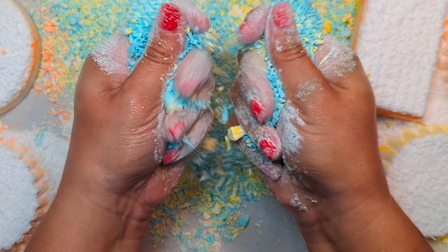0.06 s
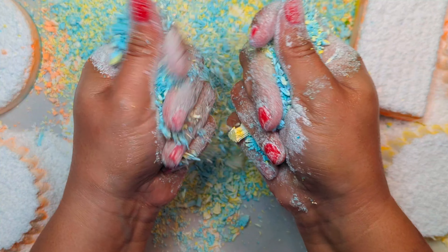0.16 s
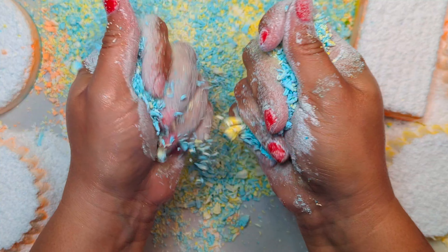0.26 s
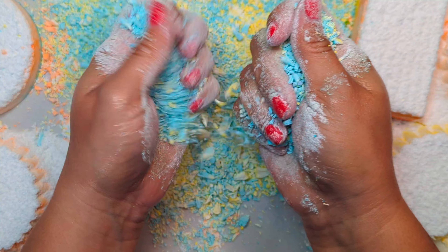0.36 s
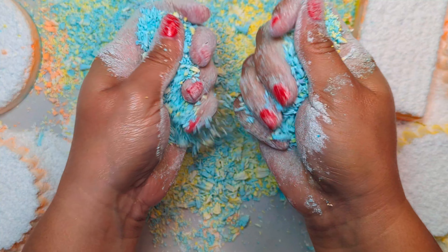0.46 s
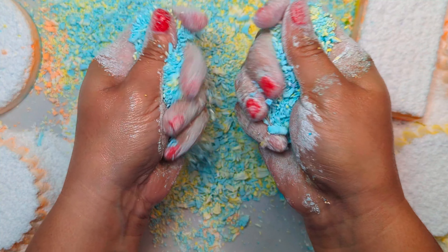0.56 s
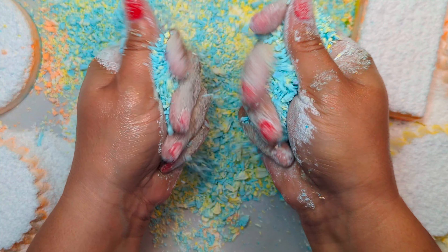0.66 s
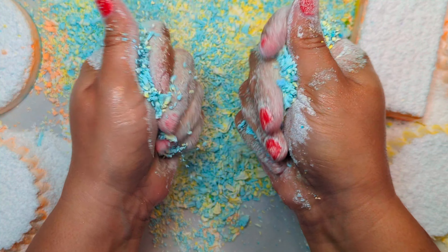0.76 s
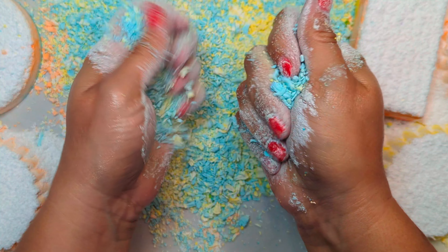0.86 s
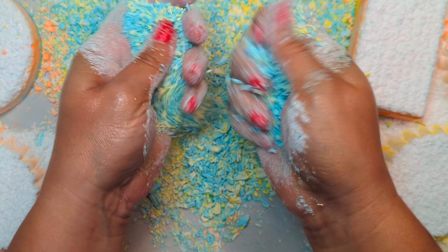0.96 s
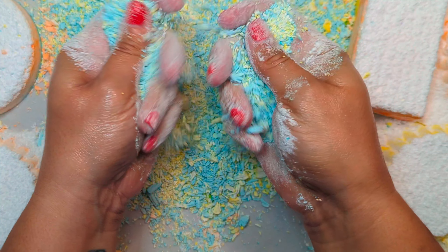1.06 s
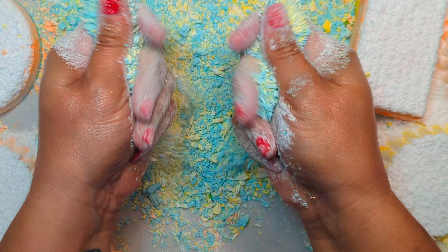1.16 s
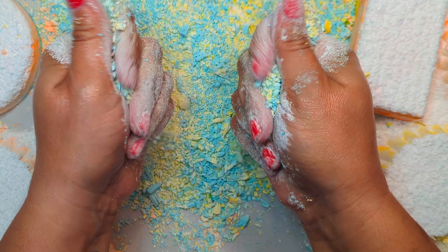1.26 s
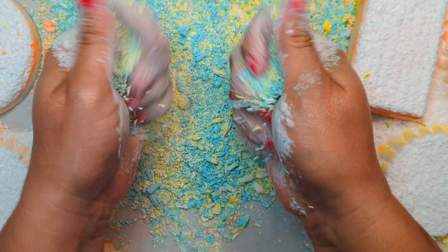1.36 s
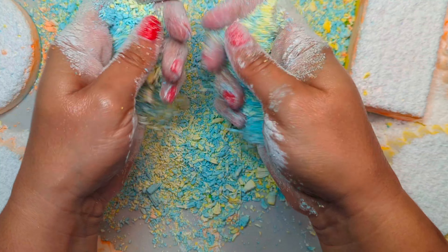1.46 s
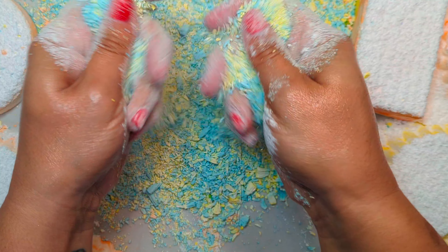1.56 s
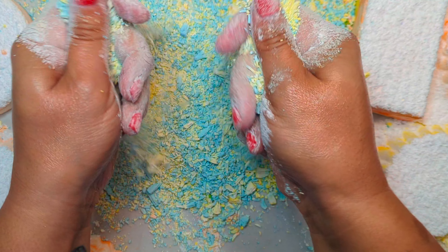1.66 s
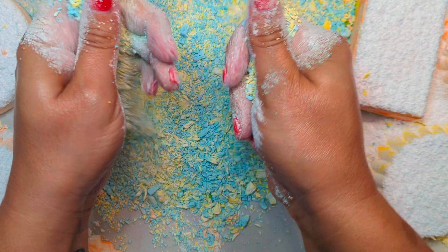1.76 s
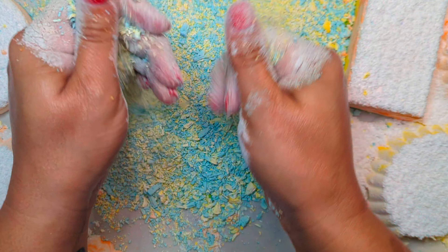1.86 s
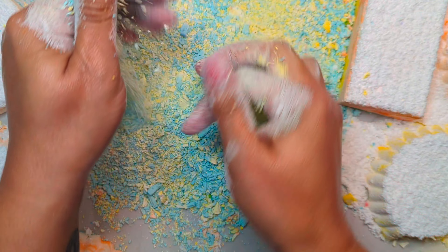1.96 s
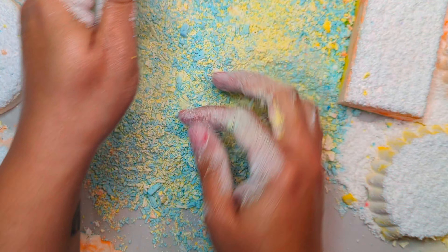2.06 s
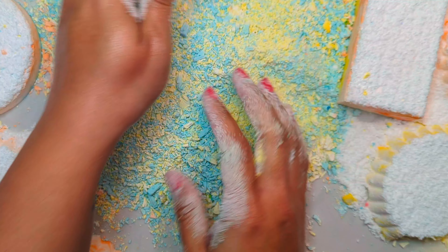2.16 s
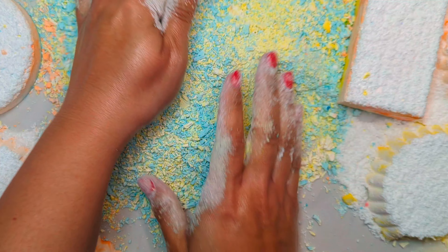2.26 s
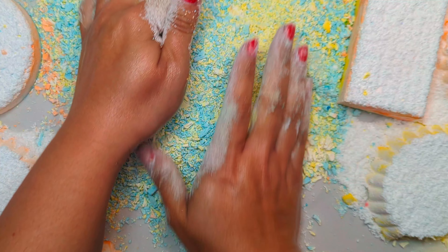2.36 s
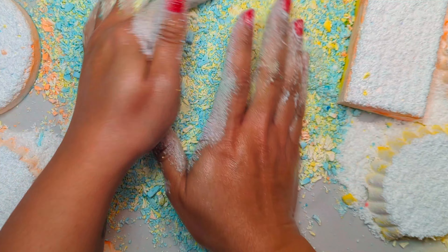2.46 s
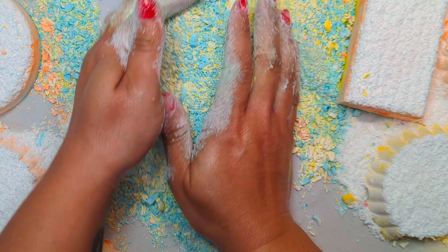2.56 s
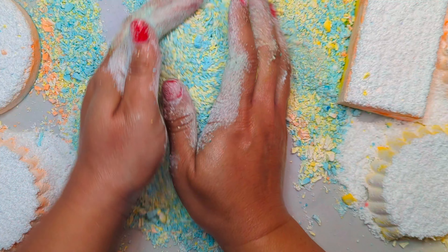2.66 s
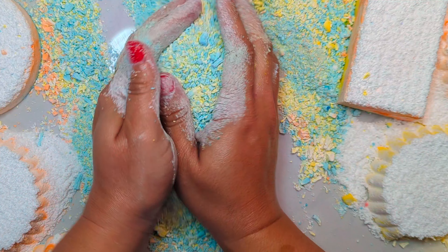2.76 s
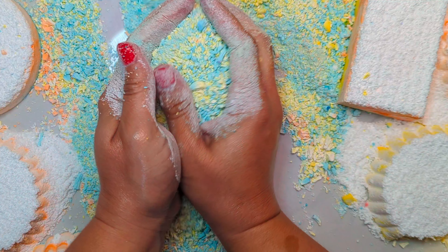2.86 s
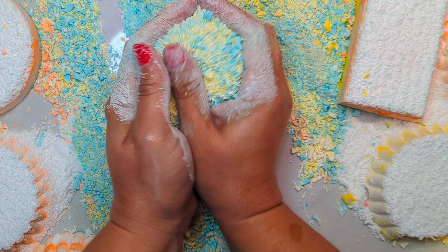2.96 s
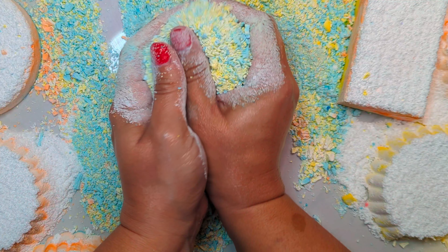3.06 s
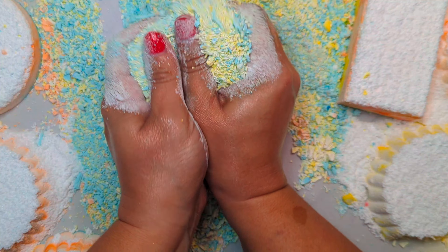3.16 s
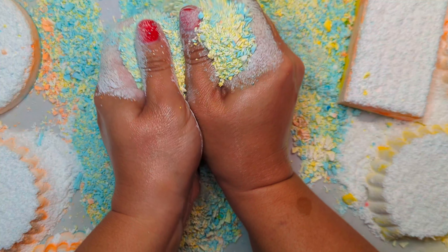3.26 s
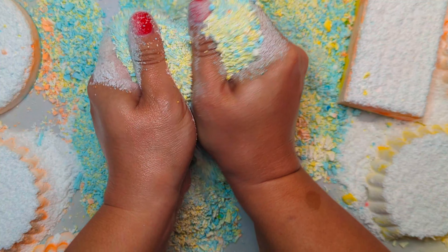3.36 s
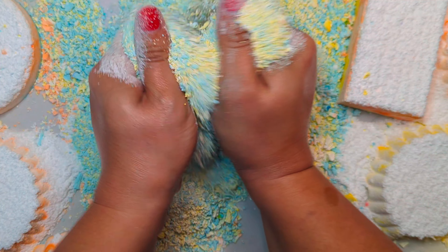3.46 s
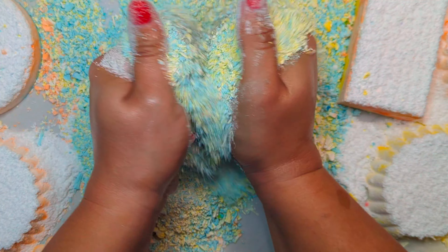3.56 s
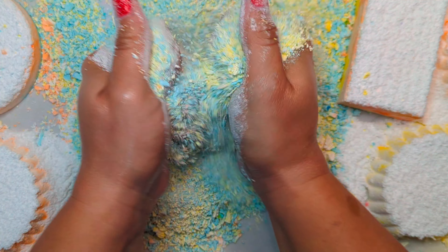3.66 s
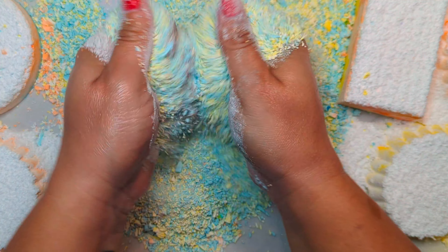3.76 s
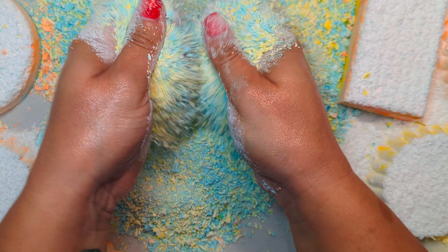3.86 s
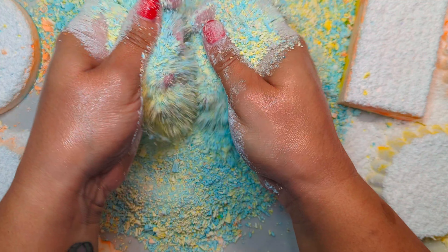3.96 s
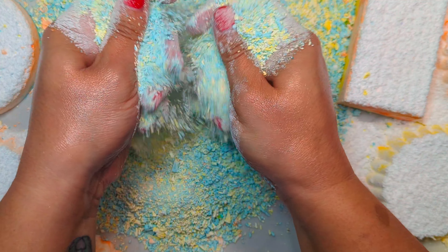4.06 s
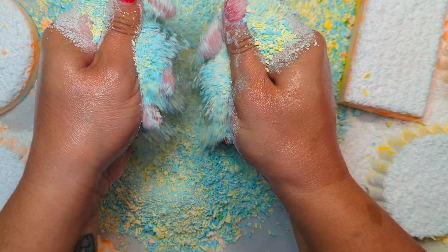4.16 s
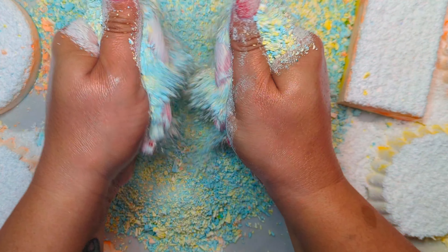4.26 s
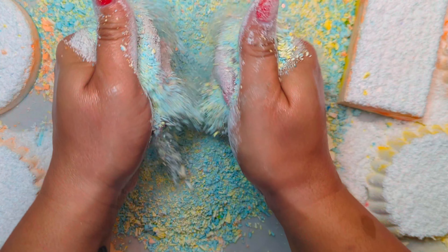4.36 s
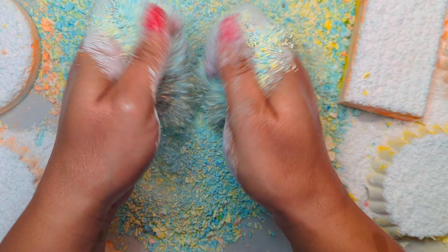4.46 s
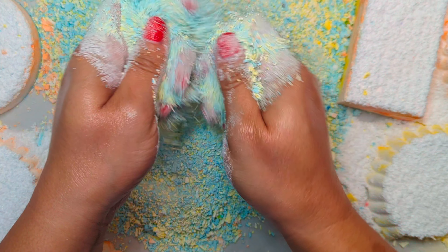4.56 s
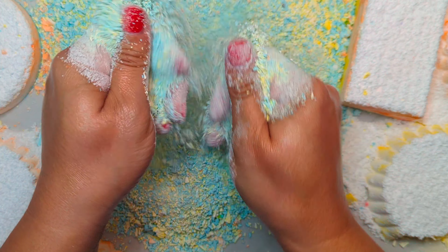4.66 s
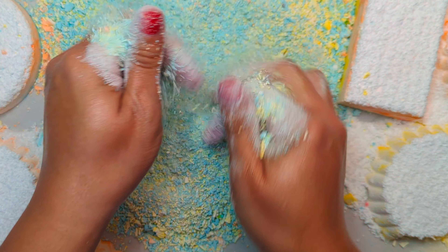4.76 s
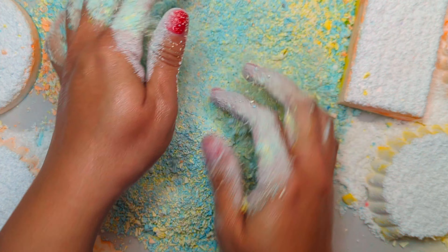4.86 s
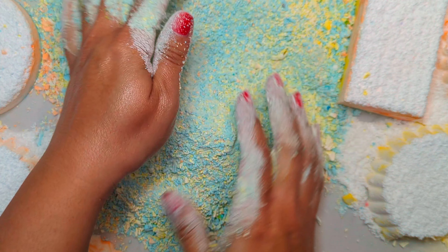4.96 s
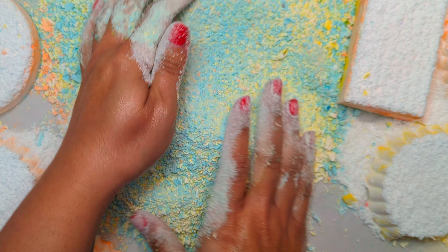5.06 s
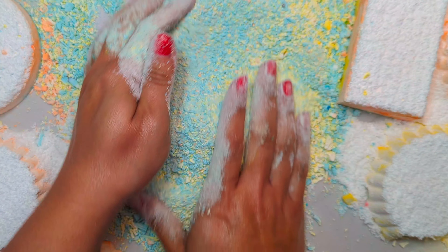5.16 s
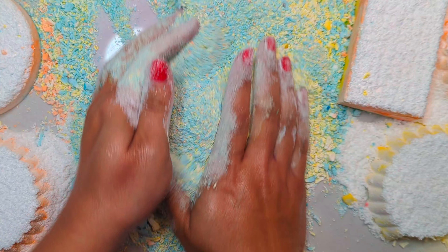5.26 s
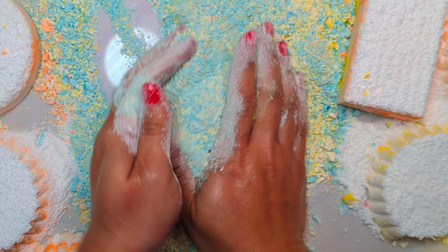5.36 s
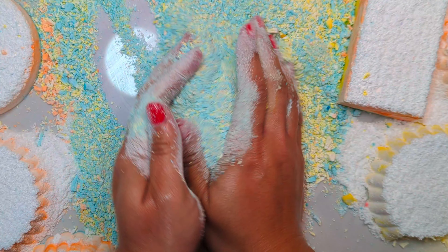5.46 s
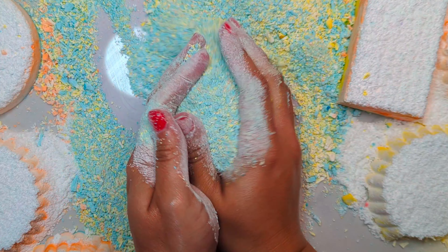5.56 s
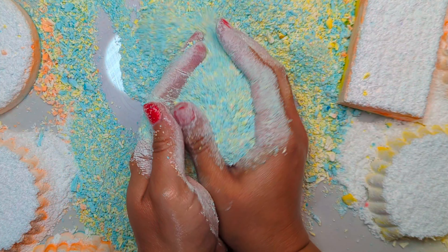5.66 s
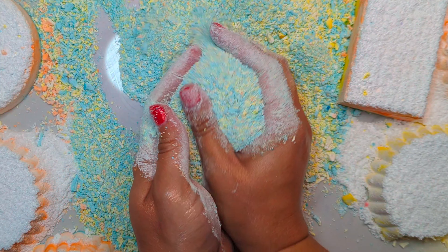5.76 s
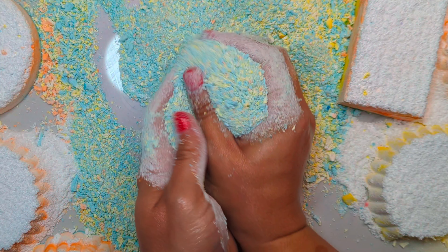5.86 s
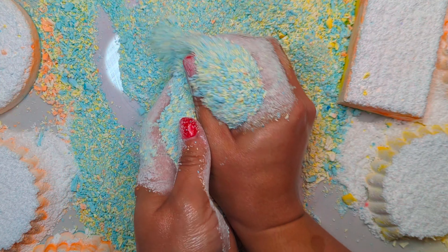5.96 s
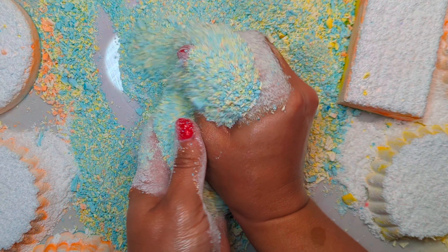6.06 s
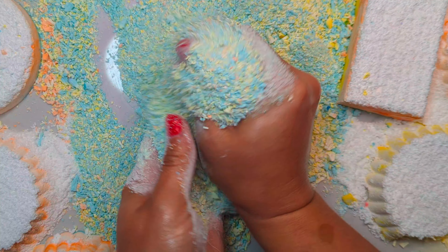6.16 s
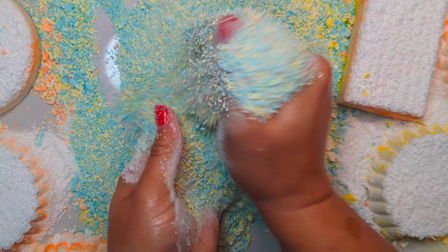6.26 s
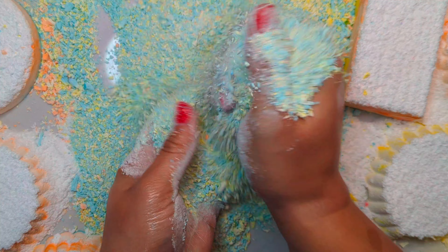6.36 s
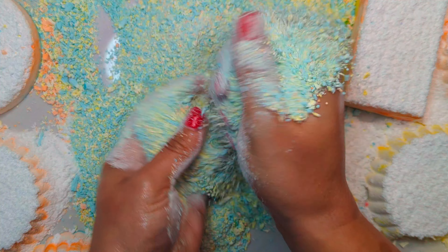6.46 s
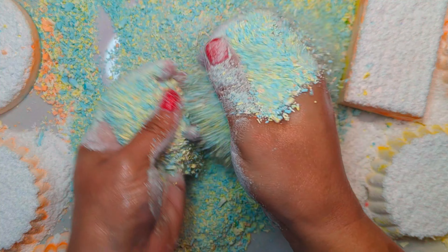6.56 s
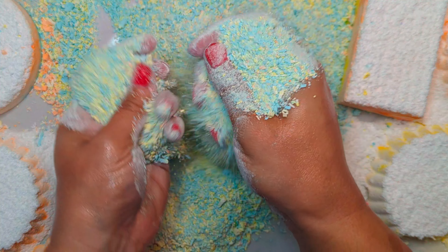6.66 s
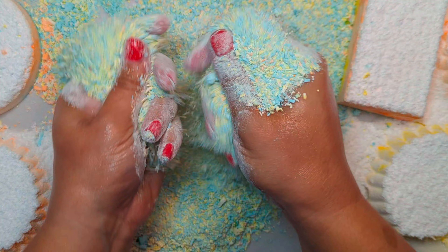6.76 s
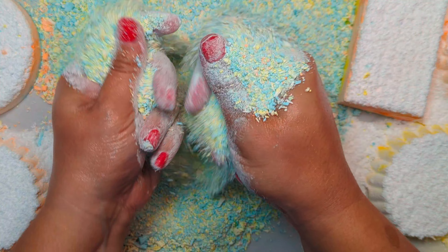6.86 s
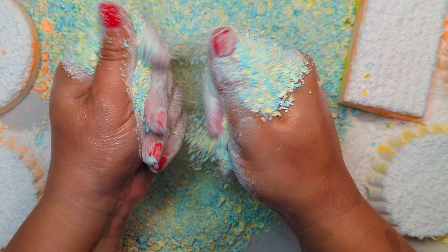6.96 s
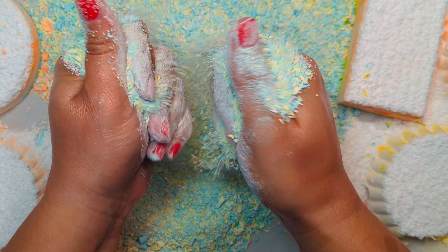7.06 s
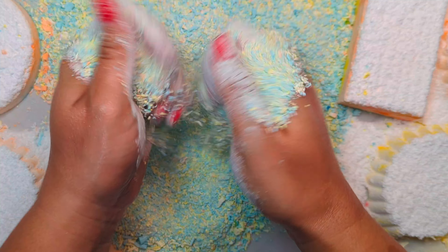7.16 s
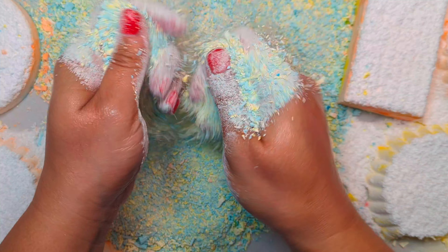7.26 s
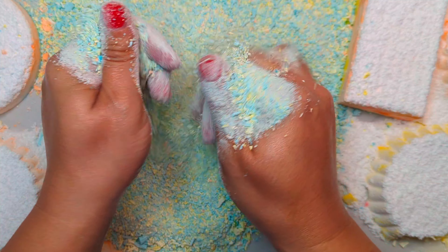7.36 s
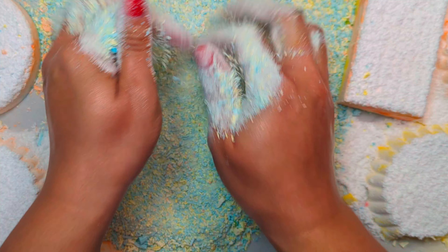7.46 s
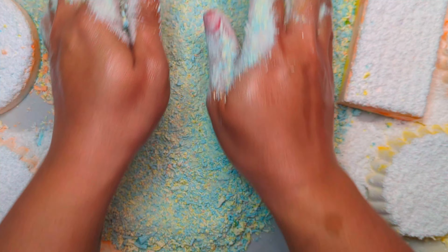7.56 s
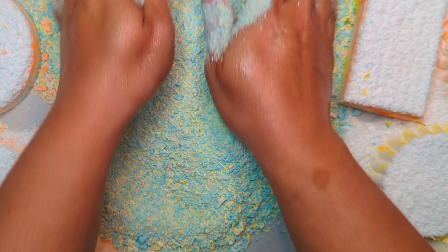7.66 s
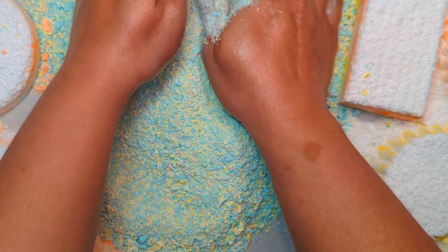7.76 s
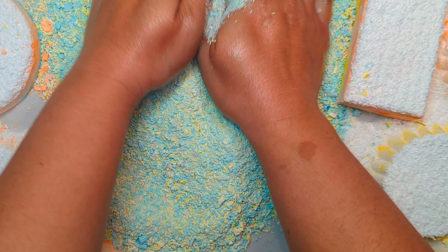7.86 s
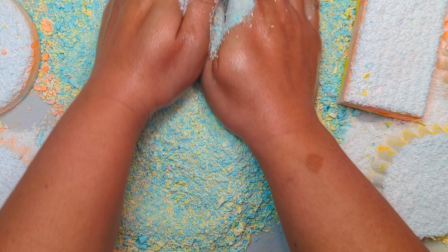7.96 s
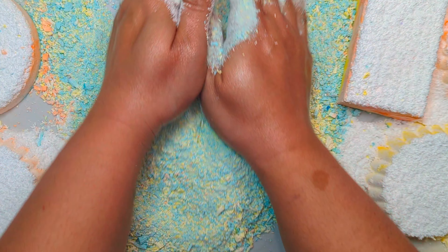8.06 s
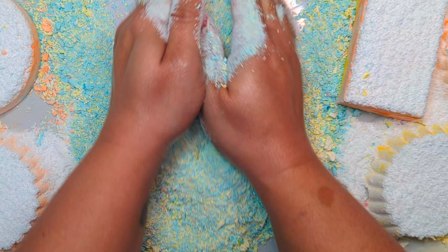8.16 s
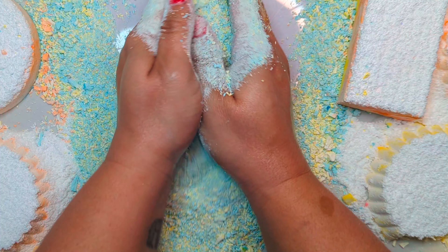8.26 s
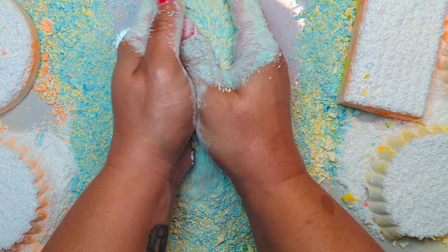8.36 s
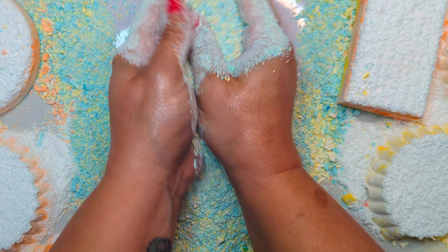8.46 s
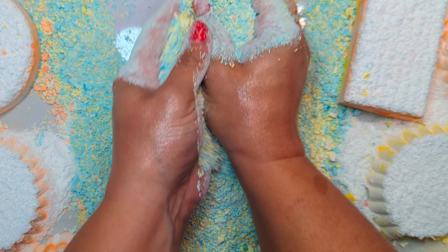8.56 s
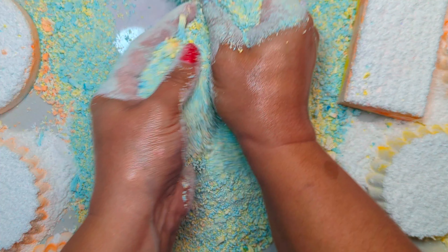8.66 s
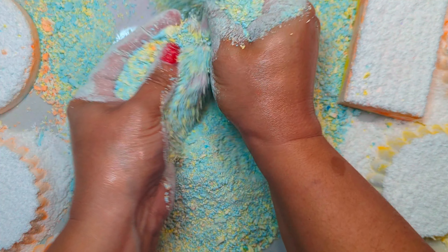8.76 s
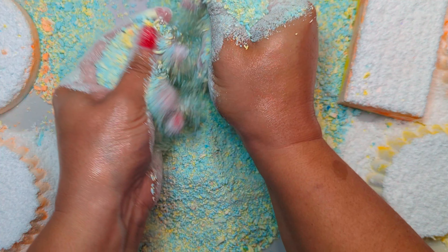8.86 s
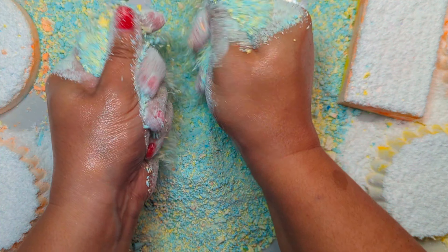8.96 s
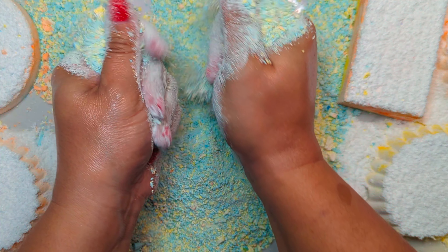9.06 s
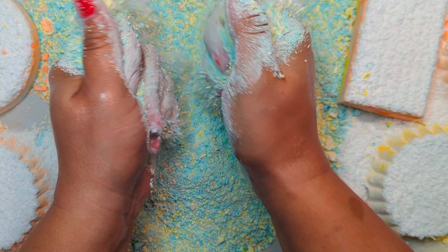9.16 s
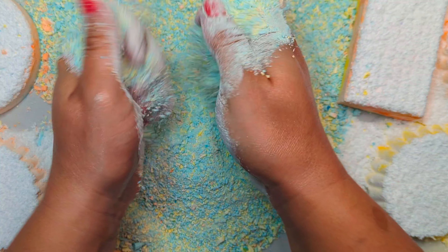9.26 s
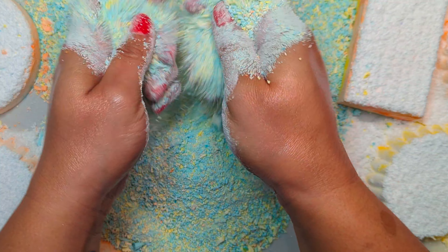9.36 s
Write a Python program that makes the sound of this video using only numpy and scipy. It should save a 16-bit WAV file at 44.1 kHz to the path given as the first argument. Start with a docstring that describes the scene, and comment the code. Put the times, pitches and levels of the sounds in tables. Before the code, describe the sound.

Hands crush dry starch crumbs in loud crunchy bursts, with gritty hiss, snapping bits, soft scooping and low table thumps, very close.

```python
"""Dry starch crumbs in two hands

Two hands squeeze, drop and scoop dry starch crumbs over a table, close to a mono microphone turned up until it clips.
Random fractures, filtered to the ringing range of each crumb size, follow the strokes of the hands in level:
lumps sound hollow in the cupped palms, chips crunch, fine grit and dust hiss, and lone crumbs snap.
Low-passed noise rumbles below as the quiet room and the table top under leaning hands."""
import sys
import numpy as np
from scipy import signal
from scipy.fft import rfft, irfft, next_fast_len
from scipy.io import wavfile
from scipy.ndimage import map_coordinates

SR = 44100
rng = np.random.default_rng(int(sys.argv[2]) if len(sys.argv) > 2 else 0)


def generate_wav(sig):
    """Save sig (samples, or channels by samples) to the path in sys.argv[1] as 16-bit PCM at SR."""
    pcm = np.round(np.clip(np.atleast_2d(sig).T, -1, 1) * 32767).astype(np.int16)
    wavfile.write(sys.argv[1], SR, pcm)


def volts(x):
    """Linear amplitude factor 10**(x/20) for a level x in dB, scalar or array-like."""
    e = np.asarray(x, float) / 20
    return 10 ** e


N = 414981  # samples

# Low noise of the room and the table top, relative spectrum: f/Hz, level/dB
RUMBLE_SPECTRUM = [(13, -31), (22, -1), (113, 0), (260, -9), (340, -6.5), (570, -120)]
ROOM_DB = -41.5  # rms of the room alone
# Wrists and hands lean on the table top: middle t/s, length/s (14.3 dB down this far off), rumble level/dB
PRESSES = [(.15, 0.33, -31), (.75, .5, -38.5), (1.3, .4, -37), (1.808, 0.25, -33.5), (2.6, 0.57, -47),
           (3.407, 0.84, -35.5), (4.2, 0.48, -38), (4.72, 0.17, -34.5), (5.21, 0.22, -37.5),
           (5.715, 0.45, -38), (6.363, 0.14, -35), (7.1, 0.58, -38), (7.438, 0.081, -37), (8.3, 0.75, -38),
           (8.9, .5, -29.5)]

# Crumb sizes in the order chips, packed heap, lumps, chunks, grit, dust:
# lowest f/Hz, highest f/Hz, rate before clumping/(1/s), weight of the big breaks (0-1), size spread/dB
CRUMB_SIZES = [(1900, 4210, 12000, 0.41, 0), (266, 466, 5000, 0.24, 1.5), (495, 1034, 6000, 0.49, 1),
               (1015, 2020, 9000, 0.64, 1.5), (3860, 9700, 14000, 0.24, 1.8),
               (8360, 16000, 14000, 0.16, 2.2)]
# Colour of a crack as table, hands and microphone pass it on, relative: f/Hz, level/dB
CRACK_COLOUR = [(120, -38), (200, -3.5), (258, -13), (358, -8.5), (479, -8), (665, -4), (975, -6),
                (1170, 0), (2700, -1), (4340, -6.5), (6030, -1), (7230, -8.5), (12700, -15.5),
                (15500, -21.5)]
# The same for crumbs swept lightly over the table: f/Hz, level/dB
SWEPT_COLOUR = [(120, -37), (200, -5), (600, -1), (1000, 0.5), (1600, -2.5), (2500, -3.5), (3600, -2.5),
                (4500, -6), (6200, -0.5), (7000, -3.5), (8000, -3), (9300, -9), (11000, -10), (13500, -12),
                (15600, -16)]
# Short tail from table and hands: f/Hz, t60/s
TAIL_T60 = [(300, 0.29), (3000, 0.055), (12000, 0.17)]

# A stroke rises from 20 dB down to its peak and falls back to 20 dB down.
# Fists squeeze a handful: peak t/s, rise/s, fall/s, chips level/dB, extra dust through open fingers level/dB
SQUEEZES = [(0.225, 0.36, 0.18, -10, -2.2), (0.418, 0.069, 0.072, -17.5, -3.5),
            (0.555, 0.044, 0.058, -29.7, 1.8), (0.664, 0.085, 0.25, -14.0, -0.2),
            (0.78, 0.17, 0.21, -14.5, -3), (0.9, 0.1, 0.08, -15, -4.5), (1.0, 0.073, 0.11, -21.5, -3),
            (1.158, 0.12, 0.23, -16, 0), (1.28, 0.17, 0.15, -13.5, 0), (1.37, 0.08, 0.069, -17.0, 2.5),
            (1.444, 0.008, 0.112, -20, -4), (1.5, 0.055, 0.06, -30, -7), (1.673, 0.088, 0.23, -15.5, 1.0),
            (1.76, 0.08, 0.14, -20, 0.0), (1.973, 0.15, 0.042, -20, 2.8), (2.022, 0.03, 0.04, -33.5, 8),
            (3.371, 0.29, 0.38, -13.5, -4), (3.498, 0.17, 0.27, -10.5, -0.9), (3.71, 0.1, 0.093, -17, -3.5),
            (3.862, 0.11, 0.24, -18, -1.5), (4.152, 0.15, 0.16, -12, -6.5), (4.346, 0.28, 0.21, -14, 2.2),
            (4.521, 0.054, 0.1, -19, -7), (4.701, 0.086, 0.16, -15.5, 4), (6.235, 0.289, 0.253, -14.5, -4),
            (6.315, 0.13, 0.13, -16.5, 5.5), (6.601, 0.13, 0.12, -24, 3.2), (6.844, 0.19, 0.13, -15, -2.5),
            (7.033, 0.42, 0.27, -14.5, 0.6), (7.24, 0.068, 0.078, -24.5, -8),
            (7.384, 0.071, 0.14, -17, 0.5), (7.45, 0.08, 0.033, -26, 11), (7.51, 0.03, 0.032, -25, 5.5),
            (8.856, 0.2, 0.21, -14.5, -1.5), (8.964, 0.092, 0.063, -11.5, -1),
            (9.068, 0.16, 0.039, -14.5, 3.5), (9.121, 0.244, 0.31, -15.0, -0.5),
            (9.213, 0.29, 0.11, -16.5, 4), (9.34, 0.06, 0.11, -22.5, -5)]
# The handful in the fists: t/s, how finely packed (0-1), level of the chunks added to the mix/dB
PACKING = [(.2, 0.28, 3), (.45, .3, 3.5), (.8, 0.27, .1), (1.15, 0.1, -0.3), (1.3, 0.26, 4),
           (1.45, 0.2, -5), (1.7, 0.04, -0.2), (1.97, 0.1, -9), (3.35, 0.7, 1.5), (3.6, 0.56, -4.5),
           (4.2, 0.53, -2.5), (4.5, 0.92, 2.5), (4.7, 0.52, 3), (6.2, 0.75, 1), (6.85, 0.61, -0.5),
           (7.25, 1, 0), (7.45, 0.4, 0.5), (8.85, 0.88, -3), (8.97, .5, -1.5), (9.1, .7, -1.7),
           (9.25, 0.47, 1.5)]
# Lone crumbs that snap or land: t/s, splinters level/dB, splinters t60/s, first crack level/dB re splinters
SNAPS = [(2.07, -13.5, 0.035, 7), (2.215, -20, .06, -8), (2.2457, -21, 0.11, -10), (2.266, -24, .05, -4),
         (2.358, -21, .02, 21), (5.0769, -26, 0.062, -6), (5.124, -21, .08, -8), (5.134, -14, .06, -10),
         (5.1893, -13, 0.068, -8), (5.367, -17, 0.049, -6), (5.5323, -9.5, 0.072, 3),
         (5.586, -10.5, 0.06, 2), (5.639, -12.5, .08, -8), (5.702, -12, 0.086, -6), (6.7306, -28, .05, -10),
         (7.6594, -24, 0.065, -6), (7.7598, -22, 0.046, -8), (7.834, -24, .06, -6), (7.958, -20, .05, -8),
         (8.21, -19, .05, -6), (8.33, -21, .04, -2.5)]
# Gain on the noise of scattering splinters: f/Hz, level/dB
SPLINTER_COLOUR = [(300, -33), (900, -5), (3500, -2), (7500, -4), (10000, -14), (16000, -24)]
# Flat hands land and gather crumbs over the table: peak t/s, rise/s, fall/s, chips level/dB
SWEEPS = [(2.374, 0.021, 1.566, -33.0), (5.131, 0.015, 0.616, -30.5), (7.883, 0.12, 0.687, -30.5)]
# Cupped palms lift a heap: peak t/s, rise/s, fall/s, chips level/dB, closure of the palms (0-1)
SCOOPS = [(2.862, 0.39, .162, -30, .3), (3.077, 0.16, 0.2, -26.5, .6), (3.223, 0.44, 0.22, -19, .5),
          (3.39, 0.25, 0.17, -20, 0.1), (5.62, 0.15, .575, -30.5, 0.1), (5.994, 0.32, .116, -19.5, .5),
          (6.137, 0.24, 0.098, -16.5, .5), (8.56, 0.35, 0.35, -25.5, .7), (8.63, 0.1, 0.24, -24, .98),
          (8.79, 0.22, .14, -25, .98)]
# Air between cupped palms: resonance f/Hz, width/Hz
PALM_HOLLOW = (570, 110)
# Shape of each kind of stroke, 1 = even slope, more = flatter top: rise exponent, fall exponent
SQUEEZE_BEND = (1.56, 3.11)
SWEEP_BEND = (1.7, 3.3)
SCOOP_BEND = (1.17, 2.8)

# The mixes below have the columns heap, lumps, chunks, grit, dust: level/dB re chips.
# A squeeze of loose chips
LOOSE_MIX_DB = (-31, -20.5, -5.5, -2.32, -2)
# Added by a fully packed handful, deeper and less dusty
PACKING_ADDS_DB = (20.5, 18.5, 0.7, -0.4, -10)
# Added per dB of extra dust through open fingers (dB per dB)
OPEN_FINGERS = (0.74, 0.4, -0.24, 0.53, 1)
# Change from start to end of a squeeze, ever finer
SQUEEZE_DRIFT_DB = (-4, -6.5, -1, -0.2, 6)
# Crumbs spilling from a fist
SPILL_MIX_DB = (-11, -7.6, -5, 2.5, 0.5)
# Change of the spill from a loose to a packed handful, less dust
SPILL_PACKING_DB = (0, 0.5, 4, -0.5, -7.5)
# A sweep over the table
SWEEP_MIX_DB = (-11, -4.8, -2, -0.5, -9)
# Change from start to end of a sweep as the gathered heap grows deeper
SWEEP_DRIFT_DB = (3, 9, 3, .1, .1)
# A scoop in cupped palms
SCOOP_MIX_DB = (-5.5, 1.5, -0.6, -6, -16.1)
# Change from start to end of a scoop as the palms shield heap and dust
SCOOP_DRIFT_DB = (-16, -0.5, -7, -10.2, -32)


def unit(x):
    """x at rms 1."""
    return x / np.sqrt(np.mean(x ** 2) + 1e-20)


def along(points, hz):
    """Values of (f/Hz, value) points read off on a log frequency axis."""
    f, value = np.transpose(points)
    return np.interp(np.log(hz + 1), np.log(f + 1), value)


def wobble(rate):
    """A smooth random curve, rate knots a second."""
    knots = rng.standard_normal(int(N * rate / SR) + 8)
    return map_coordinates(knots, [np.arange(N) * rate / SR])


def filtered(x, response):
    """x times a complex response of frequency."""
    m = next_fast_len(N + SR // 2)
    return irfft(rfft(x, m) * response(np.fft.rfftfreq(m, 1 / SR)), m)[:N]


def causal(x, gain):
    """x through a minimum-phase filter, so nothing rings before a crack."""
    m = next_fast_len(N + SR // 2) * 2
    cepstrum = irfft(np.log(gain(np.fft.rfftfreq(m, 1 / SR)) + 1e-5), m)
    cepstrum[1:m // 2] *= 2
    cepstrum[m // 2 + 1:] = 0
    return irfft(rfft(x, m) * np.exp(rfft(cepstrum)), m)[:N]


def rumble():
    """Low noise of the room, swelling when the hands load the table."""
    noise = filtered(rng.standard_normal(N), lambda hz: volts(along(RUMBLE_SPECTRUM, hz)))
    t = np.arange(N) / SR
    load_power = sum(volts(db - 14.3 * ((t - s) / length) ** 2) ** 2 for s, length, db in PRESSES)
    return np.sqrt(volts(ROOM_DB) ** 2 + load_power) * unit(noise)


def cracks(rate, spread_db):
    """Sizes of random fractures at rms 1: many faint, a few strong, in clumps around rate a second."""
    chance, size = rng.random((2, N))
    clumped_rate = rate * volts(1.6 * wobble(40) + 1.8 * wobble(150))
    happens = chance < clumped_rate / SR
    return unit(happens * volts(-spread_db * np.log(size + 0.0023)))


def ringing(x, low_hz, high_hz, colour, steep):
    """The pitches a crumb size rings at, with soft edges, at rms 1."""
    def gain(hz):
        band = ((1 + (low_hz / (hz + 1)) ** steep) * (1 + (hz / high_hz) ** steep)) ** -.5
        return band * volts(along(colour, hz))
    return unit(causal(x, gain))


def settling():
    """Dust keeps trickling onto the table, a faint shower of high cracks throughout."""
    trickle = cracks(6000, spread_db=4.0) * rng.standard_normal(N)
    level_db = -52 + 1.5 * wobble(3)
    return volts(level_db) * ringing(trickle, 5000, 17000, CRACK_COLOUR, steep=4)


def strokes(rows, bend):
    """Level in dB, progress (-.5 to .5) and time since the peak of every stroke, 200 times a second."""
    peak, rise, fall, db = (np.array(rows)[:, k, None] for k in range(4))
    since = np.arange(0, N / SR + .01, .005) - peak
    before = np.clip(-since / rise, 0, None) ** bend[0]
    after = np.clip(since / fall, 0, None) ** bend[1]
    progress = np.clip((since + rise) / (rise + fall), 0, 1) - .5
    return db - 20 * (before + after), progress, since


def sizes(mix_db):
    """A mix with the chips put first at 0 dB, shaped to add to (stroke, time) levels."""
    return np.r_[0, mix_db][:, None, None]


def power(level_db):
    """Power of all strokes together, for each crumb size over time."""
    return (volts(level_db) ** 2).sum(axis=1)


def squeezes():
    """Power of crumbs crushed in the fists, plus those spilling out, which fade after each peak."""
    squeeze_db, progress, since_peak = strokes(SQUEEZES, SQUEEZE_BEND)
    peak_s, _, _, peak_db, dust_db = np.array(SQUEEZES).T[..., None]
    when, *handful = np.transpose(PACKING)
    packed, chunks_db = (np.interp(peak_s, when, column) for column in handful)
    mix_db = sizes(LOOSE_MIX_DB) + packed * sizes(PACKING_ADDS_DB) + dust_db * sizes(OPEN_FINGERS)
    mix_db[3] += chunks_db
    crushed = power(squeeze_db + mix_db + progress * sizes(SQUEEZE_DRIFT_DB))
    fade_db_per_s = 34.5
    fading_db = peak_db - fade_db_per_s * since_peak
    spill_db = -14.5 + np.where(since_peak > 0, fading_db, squeeze_db)  # dB re the squeeze
    spilled = power(spill_db + sizes(SPILL_MIX_DB) + (packed - .5) * sizes(SPILL_PACKING_DB))
    return crushed + spilled


def crumbs(levels_db):
    """Big breaks shake every crumb size at once; each size adds its own finer shower."""
    breaks = cracks(2500, spread_db=1.5)
    grip_db = 0.37 * wobble(9) + 0.47 * wobble(25)  # finger pressure trembles
    # a light touch only sweeps, a firm one crushes
    pressed = np.clip((levels_db[0] + 32) / 7, 0, 1)
    total = np.zeros(N)
    for (low_hz, high_hz, rate, together, spread_db), level_db in zip(CRUMB_SIZES, levels_db):
        fractures = together * breaks + cracks(rate, spread_db)
        shower = fractures * rng.standard_normal(N)
        crushed = ringing(shower, low_hz, high_hz, CRACK_COLOUR, steep=10.8)
        swept = ringing(shower, low_hz, high_hz, SWEPT_COLOUR, steep=10.8)
        shifting_db = 0.8 * wobble(7)  # each size comes and goes as the crumbs shift
        total += volts(level_db + grip_db + shifting_db) * (pressed * crushed + (1 - pressed) * swept)
    return total


def table_and_hands(x, wet_db, count=160):
    """Table and hands smear cracks into a short noise tail, drawn anew for each of count equal pieces."""
    out = np.zeros(N + SR)
    start = 0
    for piece in np.array_split(x, count):
        hz, t, z = signal.stft(rng.standard_normal(SR // 5), SR, nperseg=128)
        decay = volts(-60 * t / along(TAIL_T60, hz)[:, None])
        tail = signal.istft(z * decay, SR, nperseg=128)[1]
        wet = signal.fftconvolve(piece, tail / np.linalg.norm(tail))
        out[start:start + len(wet)] += wet
        start += len(piece)
    return x + volts(wet_db) * out[:N]


def snaps():
    """A lone crumb cracks sharply as one click, then its splinters scatter as decaying noise."""
    crack, scatter = np.zeros(N), np.zeros(N + SR)
    t = np.arange(SR // 4) / SR
    for s, db, t60, crack_db in SNAPS:
        start = round(s * SR)
        crack[start] = volts(db + crack_db)
        scatter[start:start + len(t)] += volts(db - 60 * t / t60) * rng.standard_normal(len(t))

    def tick(hz):  # a crack is too brief to push low air
        return (1 + (5000 / (hz + 1)) ** 4 + (hz / 13000) ** 4) ** -.5
    return causal(crack, tick) + causal(scatter[:N], lambda hz: volts(along(SPLINTER_COLOUR, hz)))


def sweeps():
    """Power of crumbs gathered lightly over the table by flat hands."""
    sweep_db, progress, _ = strokes(SWEEPS, SWEEP_BEND)
    return power(sweep_db + sizes(SWEEP_MIX_DB) + progress * sizes(SWEEP_DRIFT_DB))


def scoops():
    """Power of the heap lifted in cupped palms, and the power of its lumps weighted by palm closure."""
    scoop_db, progress, _ = strokes(SCOOPS, SCOOP_BEND)
    scooped_db = scoop_db + sizes(SCOOP_MIX_DB) + progress * sizes(SCOOP_DRIFT_DB)
    closure = np.array(SCOOPS)[:, 4]
    return power(scooped_db), closure @ volts(scooped_db[2]) ** 2


def palms(x, cupped):
    """Closed palms lend the crumbs the ring of their hollow, a single resonance of the air inside."""
    hollow_hz, width = PALM_HOLLOW
    ring = filtered(x, lambda f: 1j * f * width / (hollow_hz ** 2 - f * f + 1j * f * width))
    return x + 0.83 * cupped * ring  # 0.83: ring between fully closed palms


def hands():
    """Level in dB of every crumb size over time, and how far closed palms enclose the sound."""
    scooped, enclosed_lumps = scoops()
    total = squeezes() + sweeps() + scooped + 1e-9
    enclosed = enclosed_lumps / total[2]  # share of the lumps

    def per_sample(v):
        return np.interp(np.arange(N) * 200 / SR, np.arange(len(v)), v)
    return [per_sample(10 * np.log10(p)) for p in total], per_sample(enclosed)


def scene():
    """Crumbs close to the microphone over the rumble; one microphone feeds both channels."""
    levels_db, cupped = hands()
    handled = palms(crumbs(levels_db), cupped)
    near = volts(-0.17) * table_and_hands(handled + settling() + snaps(), wet_db=-11.5)
    return np.tile(near + rumble(), (2, 1))


def low_pass(x):
    """Removes everything above the highest recorded frequency."""
    return signal.sosfilt(signal.butter(12, 15690, fs=SR, output="sos"), x)


def record(dry):
    """The microphone signal gets a small constant offset and clips hard at full scale."""
    offset = .003  # of full scale
    mix = np.clip(dry + offset, -1, 1)
    return low_pass(mix)


dry = scene()
out = record(dry)
generate_wav(out)
```